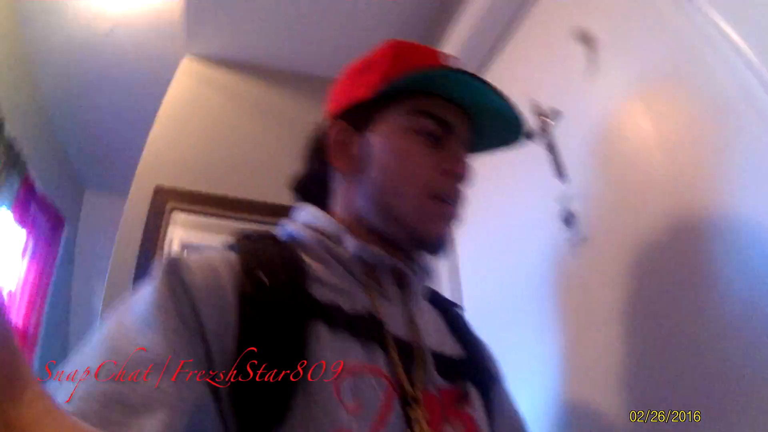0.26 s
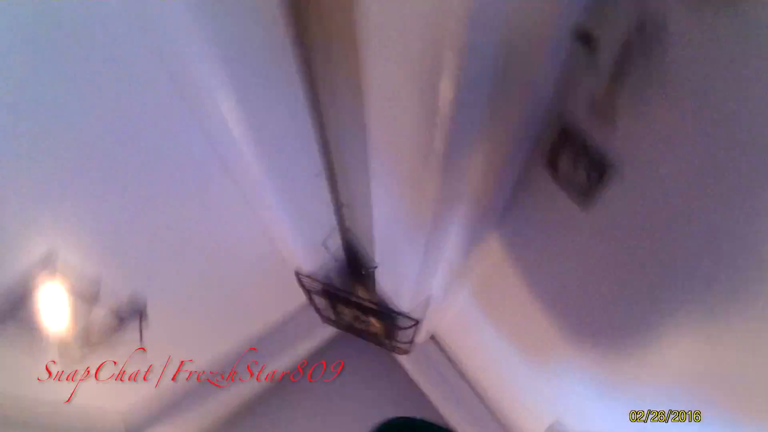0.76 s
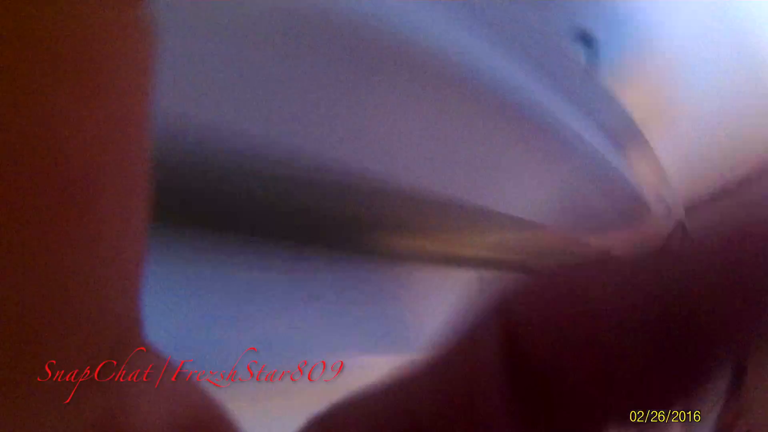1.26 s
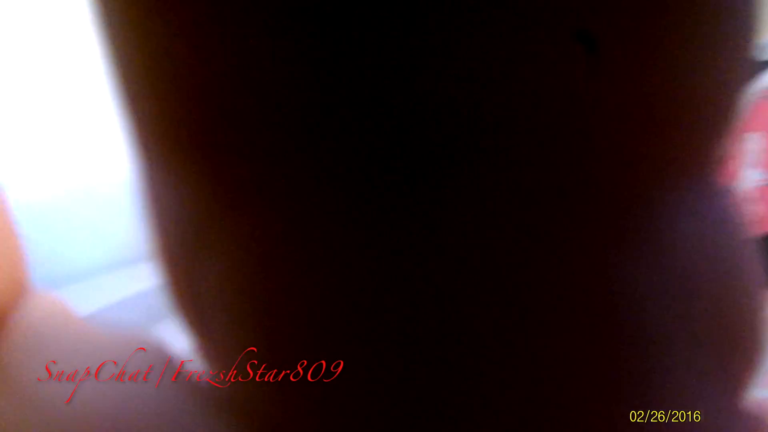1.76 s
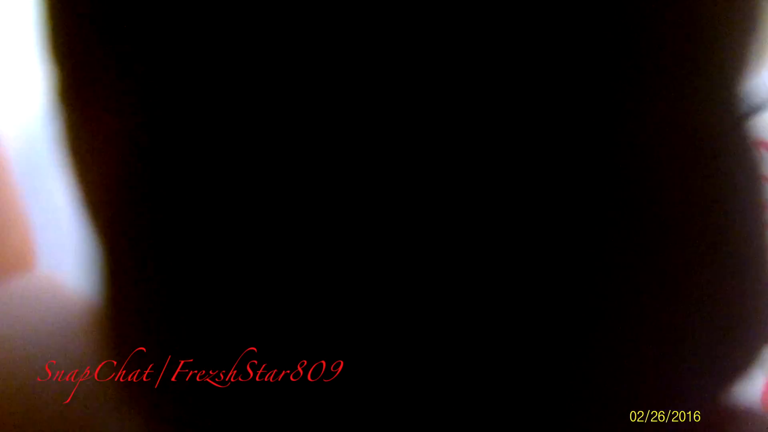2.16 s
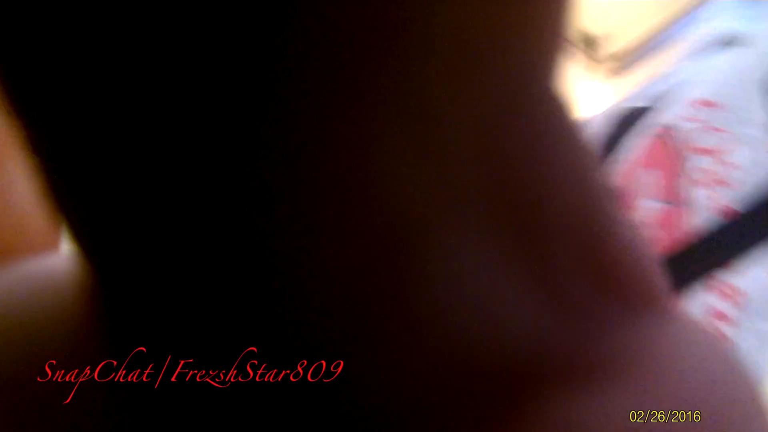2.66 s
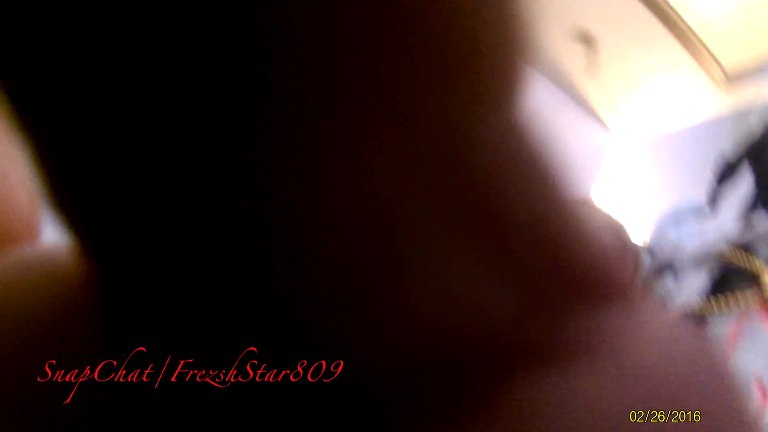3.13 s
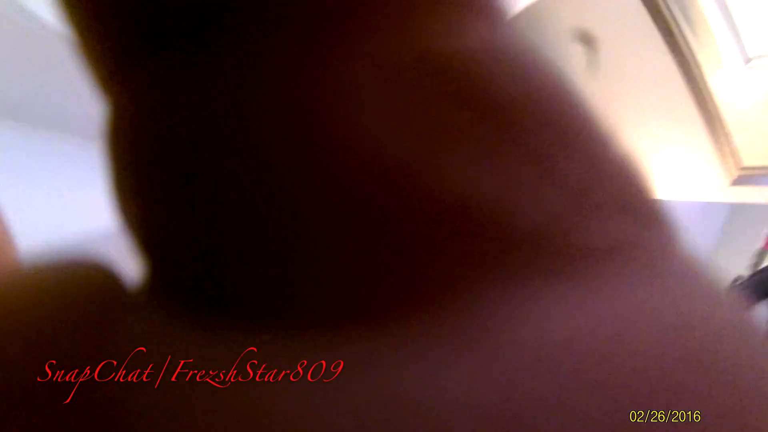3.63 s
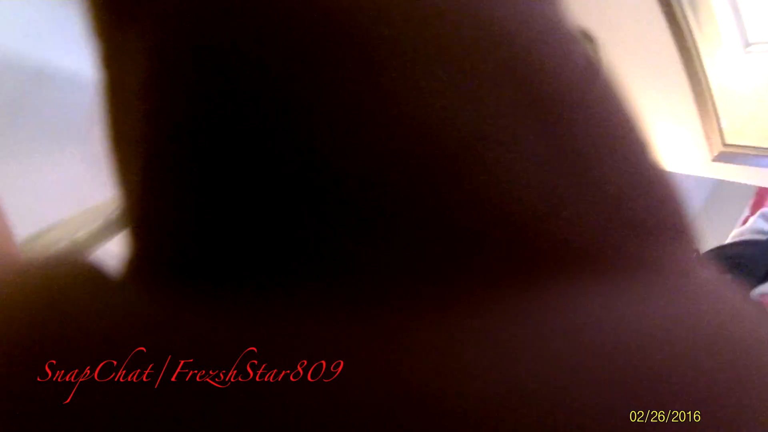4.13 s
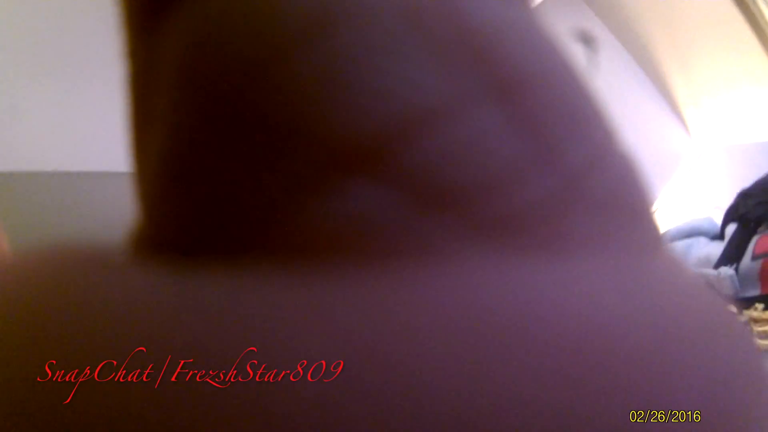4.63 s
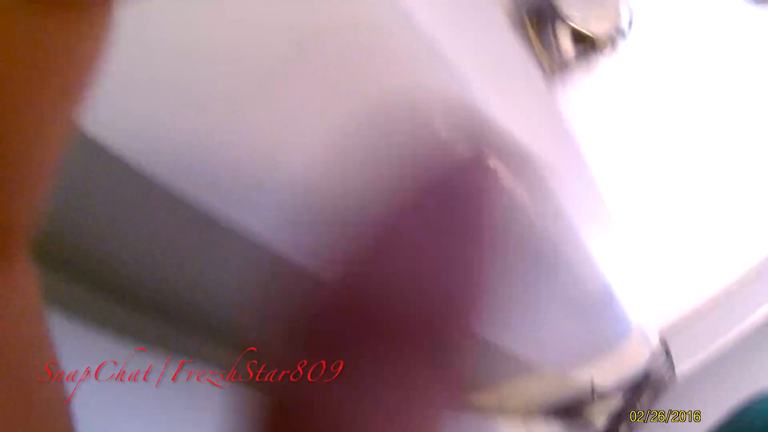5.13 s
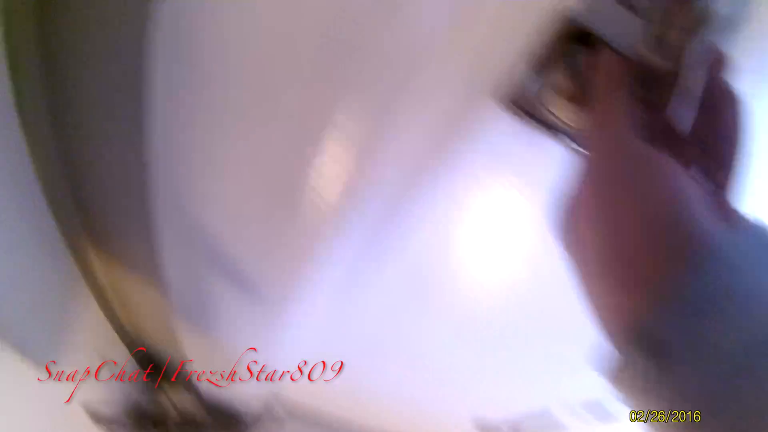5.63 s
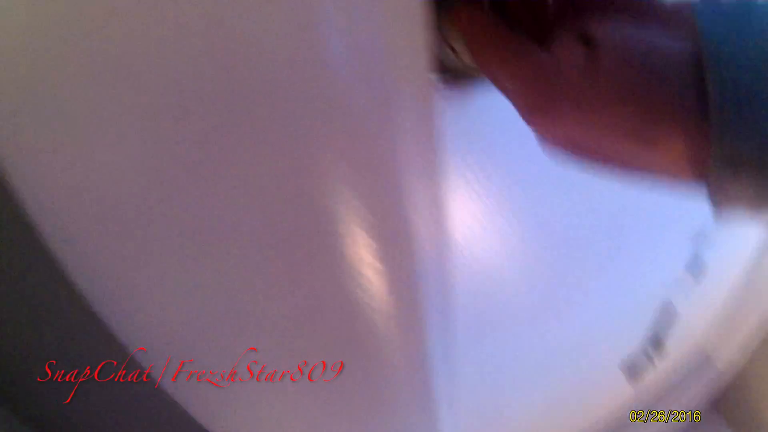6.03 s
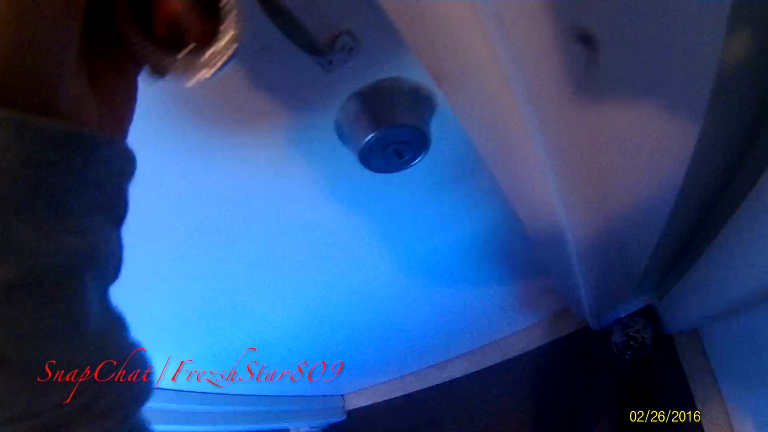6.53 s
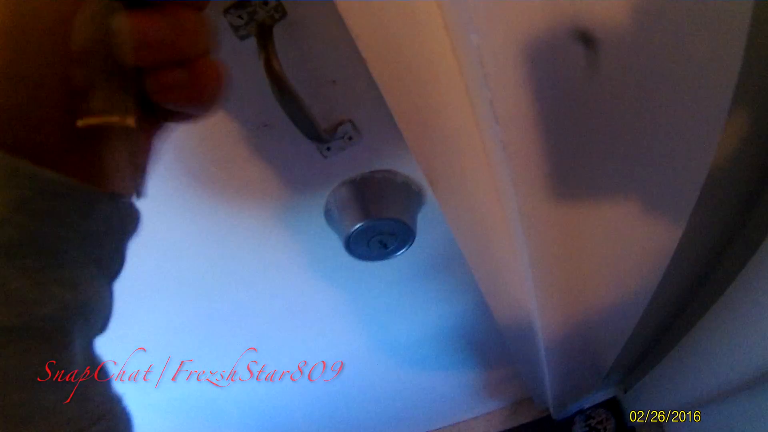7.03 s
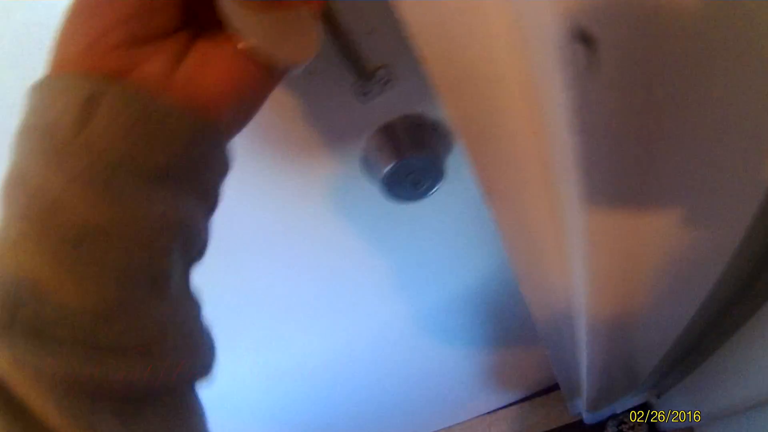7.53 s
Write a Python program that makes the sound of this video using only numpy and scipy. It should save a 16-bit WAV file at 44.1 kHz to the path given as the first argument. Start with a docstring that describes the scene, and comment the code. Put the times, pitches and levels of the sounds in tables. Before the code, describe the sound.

At a front door, someone shuffles about and picks through a bunch of jingling keys, while cloth rustles and fingers knock against the hissy hand-held microphone. The lock is worked with metallic clacks and a springy rattle of the knob, and the door opens with a low rumble. More handling bumps follow, then a slam that overloads the microphone and echoes briefly in the hallway before sudden silence.

```python
"""At a front door, over its own hiss and thin whine, a small hand-held camera is knocked and rubbed.
Keys are sorted, clinking and rasping, amid shuffles, footfalls and a faint passing hum.
From 4.4 s the lock is worked: the bolt clacks, the door comes free, the latch pings, the knob twangs.
The person steps through and at 6.95 s bangs the door shut; the hallway rings.
The camera, which overloads on the hardest blows, is switched off at 7.57 s."""
import sys
import numpy as np
from scipy import signal
from scipy.fft import rfft, irfft, next_fast_len
from scipy.io import wavfile
from scipy.ndimage import uniform_filter1d

SR = 44100
rng = np.random.default_rng(int(sys.argv[2]) if len(sys.argv) > 2 else 0)


def master(y):
    """Save y as 16-bit WAV."""
    cut = np.clip(np.atleast_2d(y).T, -1, 1)
    pcm = np.round(cut * 32767)  # scale
    wavfile.write(sys.argv[1], SR, pcm.astype(np.int16))


N = 343098
TIME = np.arange(N) / SR
AGE = TIME[:SR * 3 // 4]   # t/s within one event

# spectrum of a dry crack: f/Hz, level/dB
CRACK_SPECTRUM = [(500, -19.5), (1500, -4), (2800, -10.5), (4200, -3), (6000, -10), (8000, -17.5),
                  (11000, -13.5), (16000, -37.5)]
# modes of keys held in the bunch: f/Hz, level/dB, t60/s
BUNCH_MODES = [(6410, 2.5, 0.0033), (6980, -1.5, 0.006), (8040, -8, 0.0087), (8970, -8, 0.0097),
               (10300, -17.5, 0.007), (10900, -12.5, .035), (11210, 2, 0.0083), (12600, -13, 0.029),
               (14200, -6.5, 0.018), (14600, -2.5, 0.025)]
# bunch shifting in the hand: centre t/s, length/s, level/dB
BUNCH_SHIFTS = [(0.28, 0.15, -55.5), (2.68, 0.48, -47), (3.126, 0.15, -45.5), (3.454, 0.13, -42),
                (3.749, 0.14, -43), (4.295, 0.37, -62.5), (4.814, 0.17, -50), (5.052, 0.14, -41.5),
                (5.299, 0.26, -41), (5.777, 0.13, -39.5), (6.444, 0.24, -54), (7.186, 0.099, -42)]


def from_db(db):
    return 10 ** (np.asarray(db) / 20)


def unit_rms(x):
    return x / np.sqrt(np.mean(x ** 2) + 1e-20)


def unit_peak(x):
    """Scale the loudest millisecond to the power of a unit sine."""
    return x / np.sqrt(2 * uniform_filter1d(x ** 2, size=44).max() + 1e-20)


def add(track, t_s, sound):
    start = max(round(t_s * SR), 0)
    track[start:start + len(sound)] += sound[:N - start]


def decay(t60_s):
    return from_db(-60 * np.minimum(AGE / t60_s, 5))


def envelope(curve):
    """Gain along rows of t/s, level/dB; silent outside them."""
    t_s, db = np.transpose(curve)
    return from_db(np.interp(TIME, t_s, db, left=-120, right=-120))


def swells(moves):
    """Summed gain of movements that rise, hold and die away."""
    return sum(from_db(db) / (1 + (2 * (TIME - t_s) / length_s) ** 4) for t_s, length_s, db in moves)


def drift(rate_hz):
    """Random values joined by straight lines; rms 1."""
    knots = rng.standard_normal(N // 10)
    return unit_rms(np.interp(TIME * rate_hz, np.arange(len(knots)), knots))


def noise(spectrum, size=len(AGE)):
    """Noise shaped by rows of f/Hz, level/dB, with 12 dB/octave skirts; rms 1."""
    hz, db = np.transpose(spectrum)
    padded = next_fast_len(size)
    bins_hz = np.maximum(np.fft.rfftfreq(padded, 1 / SR), 1)
    skirts = np.minimum(bins_hz / hz[0], 1) ** 2 * np.minimum(hz[-1] / bins_hz, 1) ** 2
    gain = from_db(np.interp(np.log(bins_hz), np.log(hz), db)) * skirts
    return unit_rms(irfft(rfft(rng.standard_normal(padded)) * gain, padded)[:size])


def treble(x, cutoff_hz=5000):
    return signal.sosfilt(signal.butter(2, cutoff_hz, "high", fs=SR, output="sos"), x)


def ring(force, modes, scatter_db=2.5, detune=0):
    """Driven modes (f/Hz, level/dB, t60/s); level varies with the spot hit, pitch with the piece."""
    out = 0
    for hz, db, t60_s in modes:
        angle = 2 * np.pi * hz * (1 + detune * rng.uniform(-1, 1)) / SR
        radius = from_db(-60 / (t60_s * SR))
        gain = from_db(db + scatter_db * rng.uniform(-1, 1))
        feedback = [1, -2 * radius * np.cos(angle), radius ** 2]
        out = out + gain * signal.lfilter([0, np.sin(angle)], feedback, force + 1e-18)
    return out


def chatter(t60_s, rate_hz):
    """Force of one contact and its fading random rebounds."""
    rebounds = rng.random(len(AGE)) < rate_hz / SR
    force = rebounds * rng.normal(0, 0.69, len(AGE)) * decay(t60_s)
    force[0] = 1
    return force + 1e-18


def bursts(blows, spectrum, t60_s):
    """Heavily damped blows (t/s, level/dB): dense modes, made as decaying noise."""
    out = np.zeros(N)
    for t_s, db in blows:
        add(out, t_s, from_db(db) * unit_peak(noise(spectrum) * decay(t60_s)))
    return out


def struck(blows, modes, rattle_s):
    """Rattling blows (t/s, level/dB) on a body that rings on."""
    out = np.zeros(N)
    for t_s, db in blows:
        add(out, t_s, from_db(db) * unit_peak(ring(chatter(rattle_s, rate_hz=1200), modes)))
    return out


def room(x, t60_s, wet_db):
    """Add a diffuse tail from the close walls."""
    tail = noise([(150, 8), (1500, 2), (5000, -5), (15000, -7.5)]) * decay(t60_s) * (AGE > 0.004)
    return x + from_db(wet_db) * signal.fftconvolve(x, tail / np.linalg.norm(tail))[:N]


def electronics(hiss_db=-48, whine_db=-59):
    """The camera's hiss and rumble, with a thin, unsteady whine near 10 kHz."""
    # noise floor: f/Hz, level/dB
    hiss_spectrum = [(12, -30), (20, 3.5), (48, 5), (248, -4), (485, -11.5), (1190, -19), (2020, -23),
                     (2320, -21.5), (7730, -27), (9140, -26.5), (9950, -48), (10800, -22.5), (16000, -41.5)]
    whine = noise([(9000, -38), (9850, -17.5), (10020, -1), (10200, -18.5), (11000, -41.5)], N)
    return from_db(hiss_db) * noise(hiss_spectrum, N) + from_db(whine_db) * whine


def handling(fidget_db=-57.5, sleeve_follow_db=-14, rub_grain_db=3, shuffle_grain_db=4.17):
    """Cloth and skin catch and slip in fine grains and dry ticks; feet thud on the floor."""
    # sleeve strokes; body shuffling and door sliding: centre t/s, length/s, level/dB
    strokes = [(0.452, 0.097, -36.5), (0.592, 0.054, -28.5), (0.782, 0.14, -41), (0.914, 0.13, -34),
               (1.031, 0.059, -35.5), (1.191, 0.1, -30.5), (1.44, 0.22, -48), (1.705, 0.13, -34),
               (3.08, 0.017, -39), (4.542, 0.12, -40.5), (4.807, 0.19, -47.5), (5.115, 0.22, -37),
               (5.43, 0.23, -37.5), (5.988, 0.21, -40), (6.169, 0.072, -33), (6.29, 0.15, -41),
               (7.197, 0.065, -42)]
    shuffles = [(0.085, 0.089, -43.5), (0.97, 0.14, -39), (1.28, 0.34, -42.5), (1.7, 0.17, -43.5),
                (2.11, 0.06, -47), (2.52, 0.31, -51), (4.22, 0.14, -40), (4.53, 0.08, -31),
                (4.85, 0.54, -38), (5.37, 0.22, -36.5), (6.05, 0.43, -36.5)]
    # handling ticks; footfalls: t/s, level/dB
    tick_events = [(0.409, -19), (0.757, -9.5), (1.384, -25), (1.404, -34), (1.422, -24), (1.469, -30.5),
                   (6.485, -26), (7.154, -20), (7.259, -31.5)]
    footfalls = [(0.575, -22), (2.751, -14.5), (3.142, -15.5), (7.325, -22.5)]
    # spectra of sleeve, shuffle and footfall: f/Hz, level/dB
    cloth_spectrum = [(2000, 4), (2900, -2.5), (3800, 5.5), (5000, 3), (7500, -4), (11000, -4), (12500, -7),
                      (15500, -4.5)]
    slide_spectrum = [(59, -31.5), (100, -13), (171, -2.5), (275, -13), (499, -12.5), (1060, 1.5),
                      (1610, -2), (2110, -11), (2450, -9), (2930, -19), (3500, -15), (4550, -27.5),
                      (7700, -120)]
    tread_spectrum = [(60, -23), (120, -3.5), (190, 1.5), (330, -9.5), (620, -2), (900, -12.5),
                      (2000, -20.5), (6000, -31.5)]
    grain = unit_rms(from_db(rub_grain_db * drift(450)))
    # the sleeve moves with the hand that shifts the keys
    pressure = swells(strokes) + from_db(sleeve_follow_db) * swells(BUNCH_SHIFTS)
    rub = pressure * noise(cloth_spectrum, N) * grain
    motion = swells(shuffles) + from_db(fidget_db)
    shuffle = motion * noise(slide_spectrum, N) * from_db(shuffle_grain_db * drift(90))
    ticks = bursts(tick_events, CRACK_SPECTRUM, t60_s=0.055)
    steps = room(bursts(footfalls, tread_spectrum, t60_s=0.028), t60_s=0.29, wet_db=-7.5)
    return rub + shuffle + ticks + steps


def camera_case(ring_gain_db=1, thump_gain_db=6, crack_gain_db=7, push_s=0.00071):
    """A knock pushes the case, rings its shell and cracks; a skid swells until the finger catches."""
    # finger knocks: t/s, ring level/dB, thump level/dB, crack level/dB, main ring f/Hz
    knocks = [(0.066, 3.5, -6, 0.5, 1320), (0.11, -19.5, -36, -14, 1130), (0.259, -21, -38, -25.5, 1160),
              (0.343, -53, -57, -27.5, 1350), (0.746, -18, -29, -25.5, 1300),
              (0.758, -19.5, -37, -18.5, 1330), (1.057, -19, -58, -30, 1290),
              (1.227, -16.5, -49, -27, 1130), (1.259, -14, -33.5, -27.5, 1200),
              (3.708, -20, -22, -32, 1240), (3.751, -9.5, -19, -43, 1310), (5.829, -5.5, -17, -6.5, 1430),
              (5.859, 0.5, -18, -0.5, 1400), (5.870, 2.5, -25, -3.5, 1270),
              (5.965, -12.5, -26, -26.5, 1360), (6.015, 6, -30, -11.5, 1162),
              (6.085, 5.5, -18.5, -14, 1410), (6.105, 2.5, -19, -26, 1420),
              (6.118, -13.5, -19.5, -23, 1330), (6.358, -25, -51, -26, 1350), (7.4954, -16, -37, -6, 1410)]
    # shell modes: f/Hz, level/dB, t60/s
    shell_modes = [(1100, 12.5, 0.026), (1372, 18.5, 0.021), (1750, -39, 0.0067), (4200, -44, 0.0054)]
    # finger skids: start t/s, length/s, level/dB
    skids = [(0.095, 0.0068, -36), (0.409, 0.009, -48), (0.959, 0.034, -38.5), (5.791, 0.037, -18.5),
             (5.856, 0.015, -10.5), (6.009, 0.0053, -19), (6.077, 0.019, -24), (6.1, 0.0095, -11.5),
             (6.237, 0.012, -28.5), (6.645, 0.015, -40), (6.682, 0.0088, -44.5), (6.733, 0.0095, -43),
             (6.772, 0.01, -43), (6.802, 0.005, -38.5), (7.442, 0.0039, -29.5), (7.461, 0.01, -32)]
    # skid spectrum: f/Hz, level/dB
    skid_spectrum = [(100, 3), (800, -15), (1400, 6.5), (2600, -4), (4300, -1.5), (7000, -16.5),
                     (11000, -22), (16000, -24)]
    out = np.zeros(N)
    push = unit_peak((1 - AGE / push_s / 2) * AGE * np.exp(-AGE / push_s))
    for t_s, ring_db, thump_db, crack_db, ring_hz in knocks:
        grip_ratio = ring_hz / shell_modes[1][0]   # the grip shifts the shell's pitch
        gripped = [(hz * grip_ratio, db, t60_s) for hz, db, t60_s in shell_modes]
        force = chatter(0.003, rate_hz=1500)
        shell = from_db(ring_db + ring_gain_db) * unit_peak(ring(force, gripped, detune=0.02))
        thump = from_db(thump_db + thump_gain_db) * push
        crack = from_db(crack_db + crack_gain_db) * unit_peak(noise(CRACK_SPECTRUM) * decay(0.0088))
        add(out, t_s, shell - thump + crack)
    for t_s, length_s, db in skids:
        swell = np.interp(AGE, [0, length_s, length_s + 0.0054], [0.5, 1.2, 0])
        add(out, t_s, from_db(db) * noise(skid_spectrum) * swell)
    return out


def lock():
    """Knob spring twangs, door rumbles free, bolt clacks, latch pings; the released knob's plate rings."""
    # blows on knob spring, bolt, latch and plate: t/s, level/dB
    twangs = [(0.069, -22.5), (5.320, -8.5), (5.340, -24.5), (5.415, -17.5), (5.575, -23), (5.772, -8.5),
              (5.912, -14)]
    bolt_blows = [(4.562, -6), (4.663, -11.5), (4.788, -18.5), (4.911, -15), (5.058, -19.5), (5.302, -15),
                  (5.376, -20), (5.607, -24.5)]
    latch_pings = [(4.910, -24), (5.316, -10.5), (5.381, -31), (5.422, -28.5), (5.576, -22.5),
                   (5.771, -21.5)]
    releases = [(6.244, -15)]
    # modes of knob, latch and plate: f/Hz, level/dB, t60/s
    knob_modes = [(1200, -20, 0.12), (1468, -10, .05), (1596, 6, 0.07), (1662, 23, 0.044), (1840, -1, .05),
                  (1830, -2.5, 0.056), (2300, -5.5, 0.14), (2380, -22.5, 0.086)]
    latch_modes = [(2984, -22, 0.041), (3980, -6.5, 0.048), (4770, 3, 0.023), (5200, 0, 0.02)]
    plate_modes = [(2360, 0, 0.08), (1420, -15, 0.1)]
    # bolt in its housing: f/Hz, level/dB
    bolt_spectrum = [(59, -26), (100, -15.5), (251, -15.5), (507, -18), (1300, -5), (2780, 0.5),
                     (3610, -4.5), (4230, -17), (5830, -17), (7720, -53.5), (8890, -54.5), (10900, -28),
                     (12000, -22.5), (15600, -50), (22000, -120)]
    # door leaving its frame: t/s, level/dB
    pull_curve = [(4.42, -46.5), (4.52, -38), (4.58, -33.5), (4.66, -43.5), (4.85, -61)]
    clacks = bursts(bolt_blows, bolt_spectrum, t60_s=0.056)
    metal = struck(twangs, knob_modes, rattle_s=0.063)
    metal += struck(latch_pings, latch_modes, rattle_s=0.016)
    metal += struck(releases, plate_modes, rattle_s=0.015)
    rumble = noise([(28, -5.5), (60, -0.5), (100, -15.5), (165, 2), (300, -8.5), (600, -20.5)], N)
    return room(clacks + metal, t60_s=0.4, wet_db=-8) + envelope(pull_curve) * rumble


def key_stir(key_count=4, touch_rate_hz=700, grit_db=-3):
    """Flurries of tiny contacts ring each key faintly while the bunch shifts."""
    out = 0
    for _ in range(key_count):
        touches = (rng.random(N) < touch_rate_hz / SR) * rng.standard_normal(N)
        force = touches * from_db(12 * np.minimum(drift(45), 1.7)) + 1e-18
        grit = from_db(grit_db) * unit_rms(treble(force))
        out = out + unit_rms(ring(force, BUNCH_MODES, detune=0.04)) + grit
    return swells(BUNCH_SHIFTS) * unit_rms(out)


def light_clinks(rate_hz=24, above_shift_db=17, spread_db=4.5, body_db=-6):
    """Shifting keys touch at uneven intervals and any mode may lead; rows for key_clinks."""
    rows = []
    for centre_s, length_s, shift_db in BUNCH_SHIFTS:
        count = max(round(length_s * rate_hz), 1)
        for k, (jitter, force, pick) in enumerate(rng.random((count, 3))):
            t_s = centre_s + length_s * ((k + jitter) / count - 0.5)
            db = shift_db + above_shift_db + spread_db * (2 * force - 1)
            lead_hz = BUNCH_MODES[int(pick * len(BUNCH_MODES))][0]
            rows.append((t_s, db, lead_hz, body_db))
    return rows


def key_clinks(clink_gain_db=-1, body_gain_db=-3, contact_db=-7, lead_db=1, lead_t60_s=0.0073):
    """Keys of slightly different sizes chatter, damped by the hand; now and then one rings free."""
    # hard clinks: t/s, level/dB, lead f/Hz, relative body level/dB
    hard_clinks = [(0.8205, -7.5, 10900, -21), (0.825, -13.5, 10900, -13), (0.8713, -18.5, 6900, -26),
                   (2.372, -17.5, 15500, -26), (2.412, -24, 6200, -8), (2.5524, -27, 6260, -2),
                   (2.581, -23, 6360, -4), (2.613, -20, 16000, -6), (2.6713, -24, 14200, -17),
                   (2.822, -14.5, 15800, -13), (2.83, -15.5, 10900, -30), (2.857, -14.5, 10900, -31),
                   (2.9076, -17.5, 14860, -16), (2.964, -21, 13700, -18), (3.428, -17, 14200, -11),
                   (3.455, -14, 15500, -17), (3.6464, -11.5, 10900, -8.5), (3.6687, -12.5, 10900, -0.5),
                   (3.699, -13, 11100, -8.5), (3.7227, -12, 11600, -14), (3.8025, -14.5, 10900, -7),
                   (3.909, -24.5, 11650, -2.5), (4.0484, -28, 6980, -24), (4.0894, -30.5, 12600, -25),
                   (4.484, -28.5, 12300, 3), (4.5609, -19, 11900, 2), (4.8596, -21, 14200, 4),
                   (4.9098, -8, 15900, -33), (5.0589, -10.5, 11500, -22), (5.113, -13.5, 14200, -7.5),
                   (5.271, -16.5, 10900, -21), (5.3017, -16.5, 9500, -16), (5.3149, -8, 14700, -5),
                   (5.5486, -18.5, 6980, -16), (5.6082, -17, 10560, -8), (5.7916, -9, 11600, -17),
                   (6.2306, -9.5, 10700, -8), (6.2464, -13.5, 11800, 4)]
    # pings of a key swinging free: t/s, level/dB
    pings = [(0.820, -16.5), (2.83, -18.5), (3.179, -31), (3.2746, -8), (3.375, -32), (5.272, -18.5)]
    # modes of a whole key bending; of the free key: f/Hz, level/dB, t60/s
    bending_modes = [(2572, 8, 0.022), (3400, 6.5, 0.0042), (4400, 4.5, 0.0031)]
    free_modes = [(2410, -25.5, 0.069), (7000, 1.5, 0.077), (10860, 8.5, 0.081), (14000, -25, .03)]
    out = np.zeros(N)
    for t_s, db, lead_hz, body_db in list(hard_clinks) + light_clinks():
        force = chatter(0.03, rate_hz=5100)
        bunch = unit_peak(ring(force, BUNCH_MODES, detune=0.03))
        lead = from_db(lead_db) * unit_peak(ring(force, [(lead_hz, 0, lead_t60_s)]))
        contact = from_db(contact_db) * unit_peak(treble(force))
        body = from_db(body_db + body_gain_db) * unit_peak(ring(force, bending_modes, detune=0.09))
        add(out, t_s, from_db(db + clink_gain_db) * (unit_peak(bunch + lead + contact) + body))
    for t_s, db in pings:
        add(out, t_s, from_db(db) * unit_peak(ring(AGE == 0, free_modes, scatter_db=0)))
    return out


def hum(pitch_hz=511, waver_hz=45):
    """A faint, rough, wavering tone comes and goes."""
    # hum envelope: t/s, level/dB
    hum_curve = [(1.18, -64), (1.26, -51), (1.7, -55), (2.2, -57), (2.35, -68)]
    return envelope(hum_curve) * drift(waver_hz) * np.sin(2 * np.pi * pitch_hz * TIME)


def key_rasps(grain_db=4):
    """Brass teeth catch and slip over metal, ringing the key as long as they move."""
    # drags: start t/s, length/s, level/dB
    drags = [(2.824, .036, -32), (3.645, .018, -24), (3.668, .036, -28), (6.230, .022, -24)]
    # modes of the dragged key: f/Hz, level/dB, t60/s
    dragged_modes = [(2550, -10, 0.052), (6200, -2.5, 0.014), (10900, 7, 0.0078), (11600, 15, 0.004)]
    out = np.zeros(N)
    for t_s, length_s, db in drags:
        friction = rng.standard_normal(len(AGE)) * from_db(grain_db * drift(300)[:len(AGE)])
        gate = np.interp(AGE, [0, 0.002, length_s, length_s + 0.005], [0, 1, 1, 0])
        add(out, t_s, from_db(db) * unit_rms(ring(friction, dragged_modes)) * gate)
    return out


def key_slip(width_hz=1100):
    """A key slides round its ring, hissing in a band that rises as the free length shortens."""
    # slide path: t/s, f/Hz, level/dB
    path = [(3.22, 4360, -58), (3.30, 4620, -50), (3.37, 4700, -50), (3.43, 5300, -45), (3.47, 5600, -48)]
    t_s, hz, db = np.transpose(path)
    phase = 2 * np.pi * np.cumsum(np.interp(TIME, t_s, hz)) / SR
    return envelope(np.c_[t_s, db]) * unit_rms(drift(width_hz) * np.sin(phase))


def door_slam(leaf_db=-8, crack_db=-5, seal_db=-12, seal_s=0.008, hall_db=-15.5, hall_t60_s=1.16):
    """The door brushes its seal, hits the frame with a latch crack and rebounds; the hallway rings."""
    # blows on the frame: t/s, level/dB
    bangs = [(6.951, 6), (6.958, 9), (6.976, -2), (6.987, -1.5), (6.998, -4)]
    # door leaf modes: f/Hz, level/dB, t60/s
    leaf_modes = [(181.5, -7.5, 0.31), (227, -13, 0.6), (573, -13.5, .22), (583, -2, 0.24), (763, 1, 0.27),
                  (824, -1, 0.22), (850, -10.5, .16), (890, -10, 0.21), (970, -6.5, 0.24), (1310, -3, 0.33)]
    # spectra of slam and hallway: f/Hz, level/dB
    slam_spectrum = [(24, -41.5), (40, -18.5), (104, -29.5), (180, -7.5), (382, -31), (600, 1), (680, -15),
                     (770, -7.5), (1020, 7.5), (1150, -4.5), (1370, -2), (1760, -11), (5050, -26),
                     (16000, -46)]
    hall_spectrum = [(76, -50), (130, -28), (176, -24), (437, -17.5), (508, -23.5), (591, -12),
                     (701, -14.5), (1040, 2), (1470, -17.5), (1580, -13), (2790, -26.5), (12000, -48),
                     (15600, -77.5), (22000, -120)]
    latch_spectrum = [(2500, -16.5), (4200, -1.5), (5500, -0.5), (7000, -8.5), (12000, -14.5)]
    shut_s = bangs[0][0]
    out = bursts(bangs, slam_spectrum, t60_s=0.069)
    out += from_db(leaf_db) * struck(bangs, leaf_modes, rattle_s=0.002)
    out += bursts([(shut_s, crack_db)], latch_spectrum, t60_s=0.071)
    out += from_db(seal_db) * noise(slam_spectrum, N) * np.exp(-np.abs(TIME - shut_s) / seal_s)
    add(out, shut_s, from_db(hall_db) * noise(hall_spectrum) * decay(hall_t60_s))
    return out


def scene():
    """All sources meet at one microphone."""
    case = camera_case()
    keys = room(key_clinks() + key_stir() + key_rasps() + key_slip(), t60_s=0.43, wet_db=-16)
    return (case + keys + lock() + door_slam() + handling() + hum() + electronics())[None]


def record(dry):
    """Hard blows clip, the sound stops dead at switch-off, and the top is cut."""
    switch_off_s, cutoff_hz = 7.566, 15850
    clipped = np.clip(dry, -1, 1) * (TIME < switch_off_s)
    return signal.sosfilt(signal.ellip(10, 0.2, 70, cutoff_hz, fs=SR, output="sos"), clipped)


dry = scene()
out = record(dry)
master(out)
```